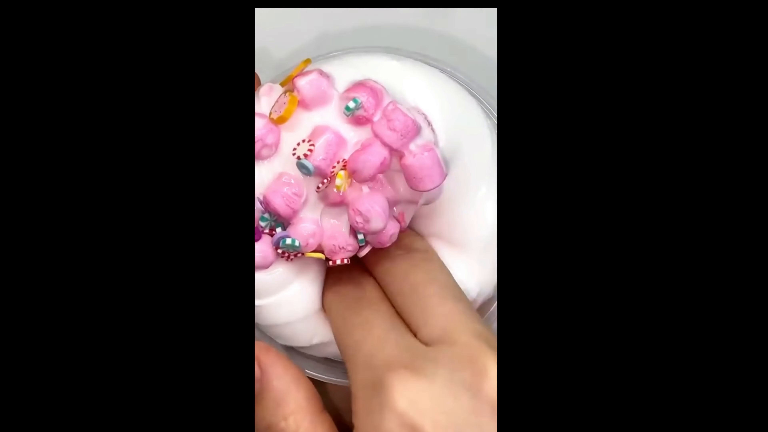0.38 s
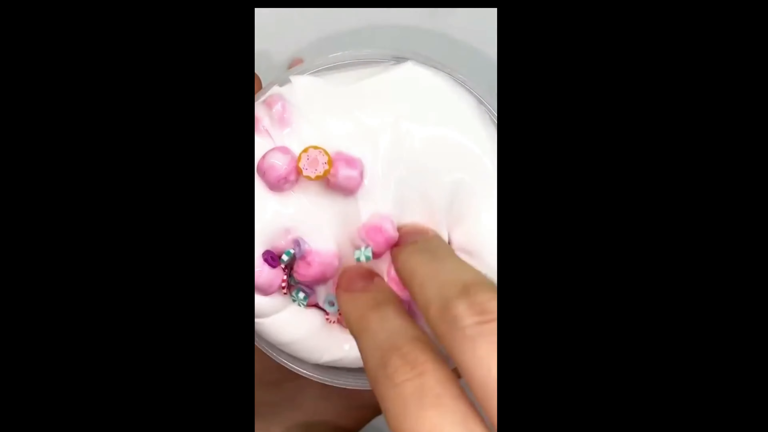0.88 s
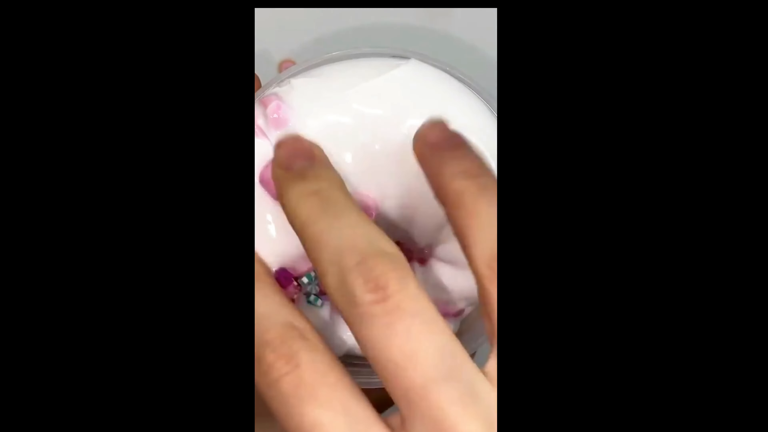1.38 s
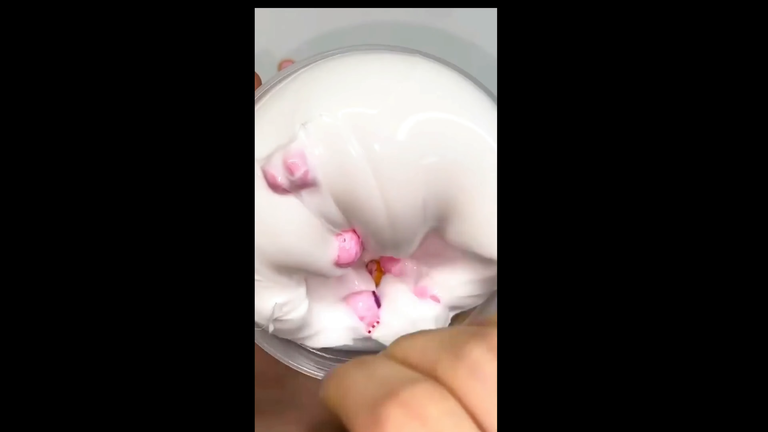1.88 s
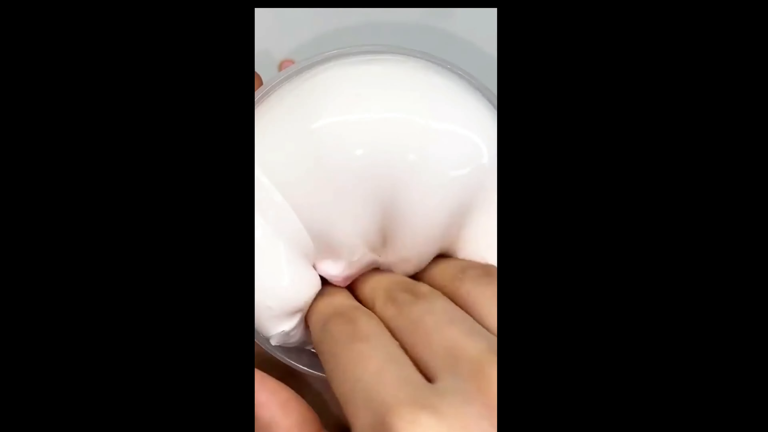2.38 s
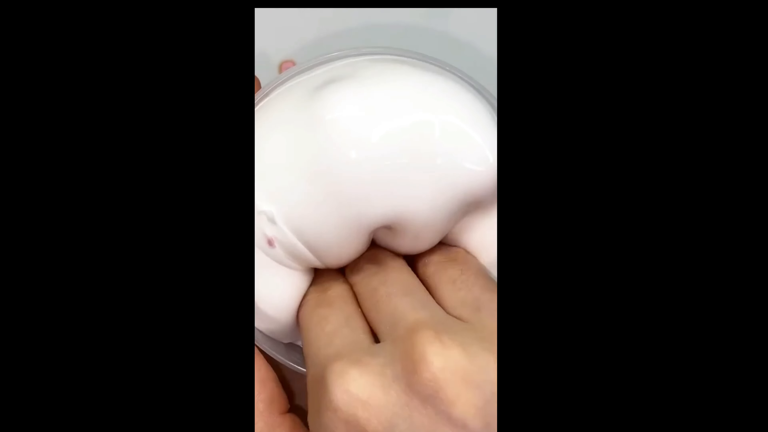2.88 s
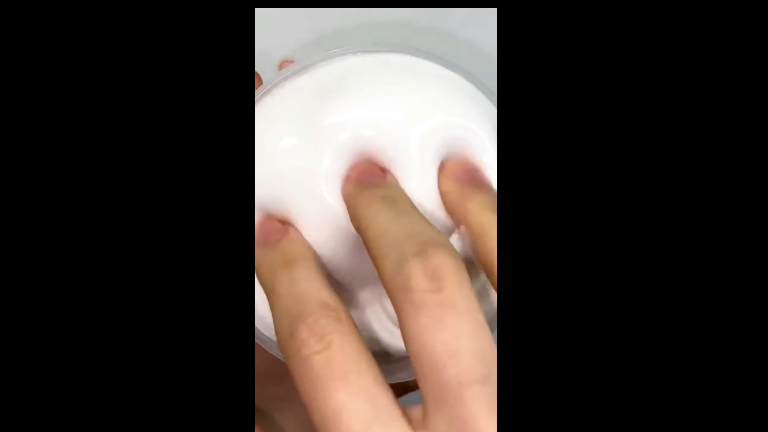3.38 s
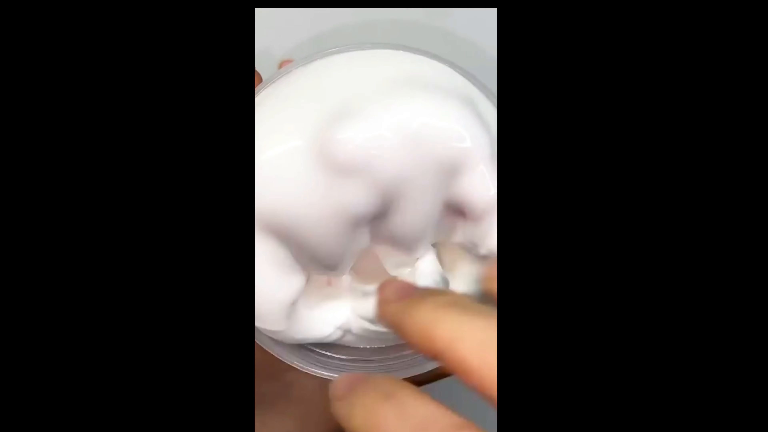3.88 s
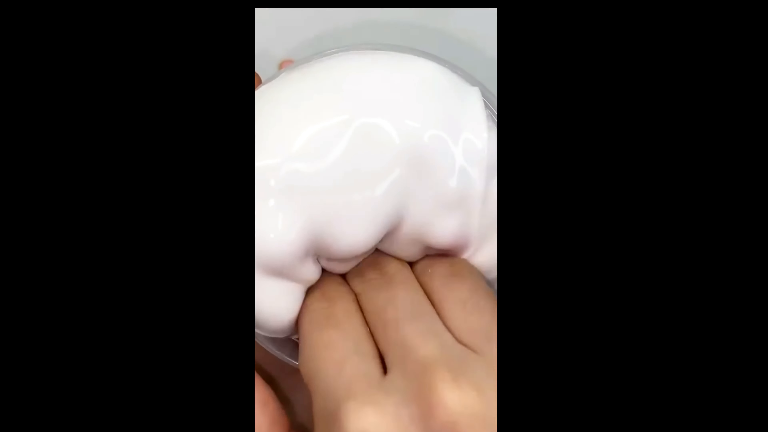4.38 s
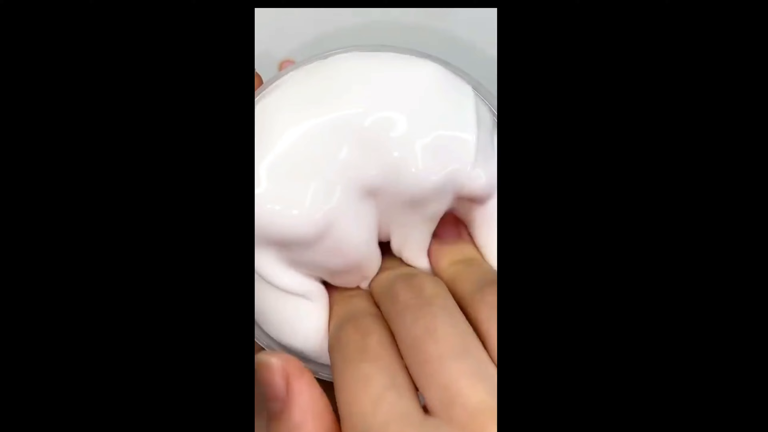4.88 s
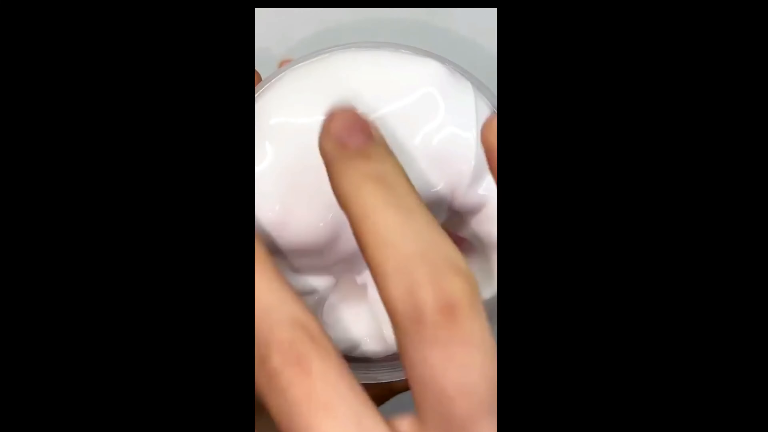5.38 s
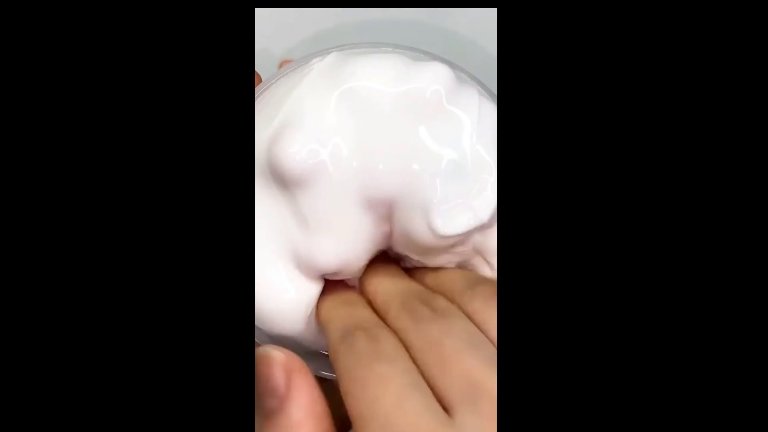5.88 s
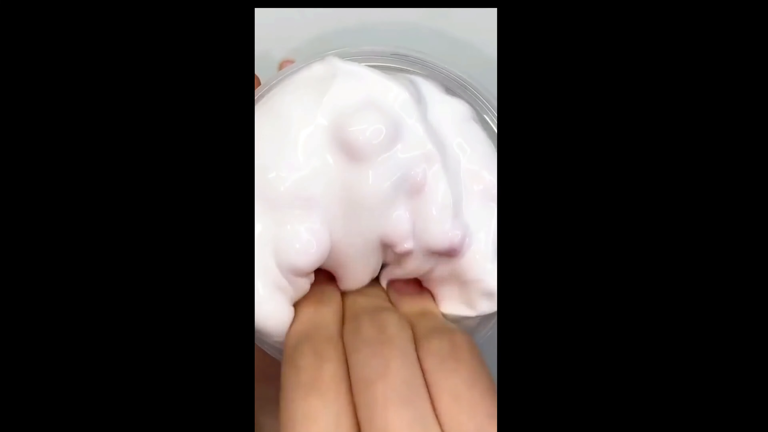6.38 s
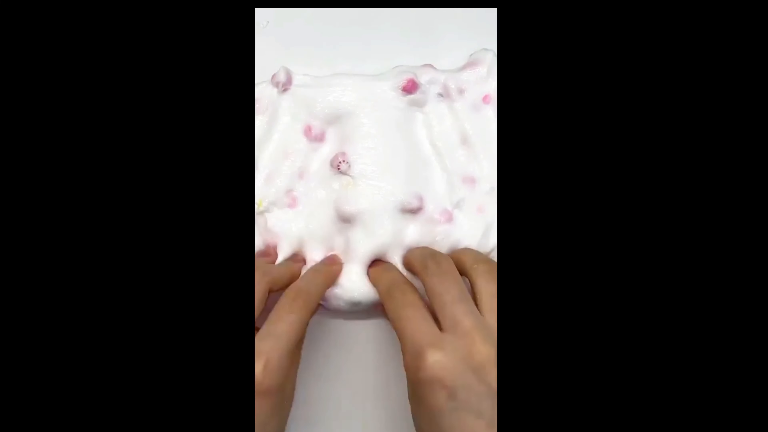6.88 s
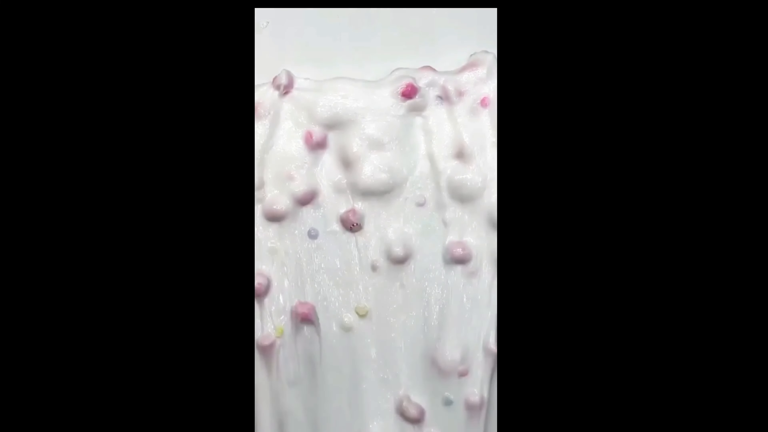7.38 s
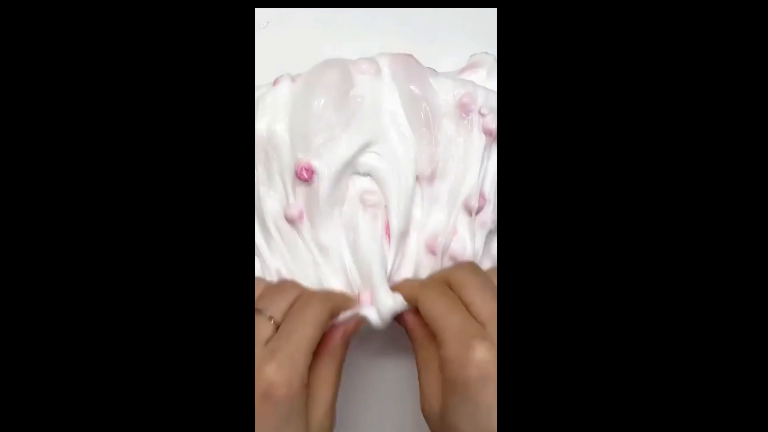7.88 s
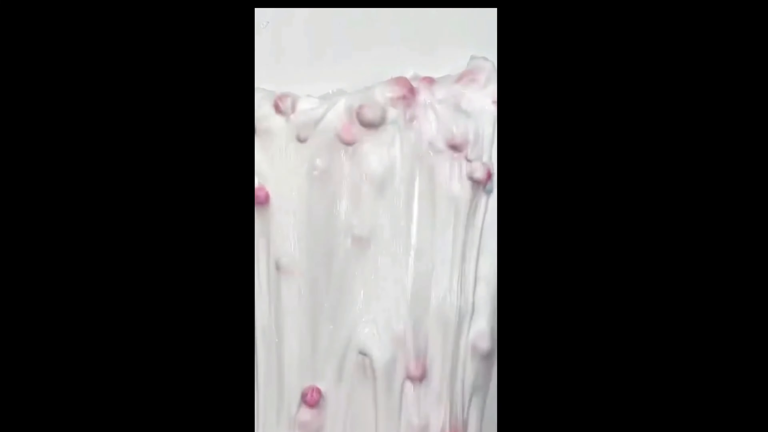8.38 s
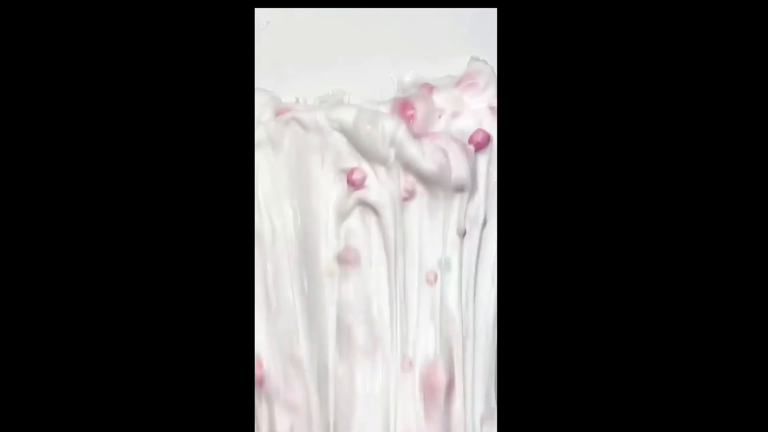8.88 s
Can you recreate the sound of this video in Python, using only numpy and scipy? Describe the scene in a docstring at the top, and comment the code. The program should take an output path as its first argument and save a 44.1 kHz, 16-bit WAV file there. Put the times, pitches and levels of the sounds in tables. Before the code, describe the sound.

Close-up slime handling in a small, quiet, fairly dry room, over a faint hush and low hand rumble. From 0 to 0.7 s, tiny clicks, a bright pop near 0.3 and light sticky crackle as fingers press into the tub. Sharp snaps follow at 0.9 and 1.05, with soft thuds at 1.25 and 1.85. At 2.4 a lower, hollow double pop comes with a heavy push. A tight, loud cluster of bright pops and a thud bursts at 3.0, another at 3.8, then strong snaps at 4.5, 5.2, 5.7 and 5.9, with a brief airy squeak-like hiss at 5.2. A crisp cluster lands at 6.65. From about 7 s the stretched sheet is folded on a table: darker wet squelches, notably at 7.7 and 8.6, rounder pops, soft bumps and faint peeling until about 9 s.

```python
"""A small quiet room, where fingers knead soft slime in a plastic tub, then fold a stretched sheet on a table.
Air pockets burst: a noisy snap over a short hollow ring. Pushes thud: low modes of tub and hand, sagging in pitch.
Sticky skin crackles: grainy noise with tiny bubble rings, driven by squeezes and pulls. Air slides in finger
hollows as narrow noise, the holding hand rumbles, the room answers with decaying noise, and a hush lies behind."""
import sys
import numpy as np
from scipy import signal
from scipy.fft import rfft, irfft, next_fast_len
from scipy.io import wavfile
from scipy.ndimage import uniform_filter1d, map_coordinates

SR = 44100
rng = np.random.default_rng(int(sys.argv[2]) if len(sys.argv) > 2 else 0)


def persist_wave(psi):
    """Save psi, clipped to +-1, as 16-bit WAV."""
    counts = np.round(np.clip(psi, -1, 1) * 32767).astype(np.int16)
    wavfile.write(sys.argv[1], SR, np.atleast_2d(counts).T)


def ratio(d):
    """dB to gain"""
    e = np.asarray(d, float) / 20
    return 10 ** e


N = 396900

# bursting air pockets: start_s, snap_peak_db, pocket_hz, pocket_peak_db
POCKET_BURSTS = [(0.04, -32.5, 1803, -53), (0.079, -39, 1860, -42), (0.1063, -42, 2070, -40),
                 (0.166, -40.5, 6440, -47), (0.2078, -28, 860, -45), (0.308, -22, 3770, -22),
                 (0.5504, -41, 2530, -40), (0.6796, -37, 3350, -53), (0.898, -14, 1580, -27),
                 (0.9738, -30.5, 1560, -38.5), (1.0457, -17, 2960, -21), (1.252, -26, 710, -33.5),
                 (1.6164, -34, 3650, -64.5), (1.787, -45, 6740, -40), (1.8278, -27.5, 1890, -29),
                 (1.8503, -24.5, 740, -28.5), (2.1075, -39, 3150, -71), (2.1648, -34, 3250, -56),
                 (2.393, -22.5, 536, -41), (2.426, -16, 600, -26), (2.4417, -15, 471, -31),
                 (2.773, -53.5, 2490, -61), (3.0112, -10, 3610, -24), (3.028, -26.5, 3330, -43.5),
                 (3.0417, -16.5, 2427, -8.5), (3.0418, -30, 748, -24), (3.043, -18.5, 7420, -12),
                 (3.8187, -13, 2610, -18.5), (3.827, -14.5, 2270, -20), (3.829, -16, 6960, -13.5),
                 (3.8452, -17, 5430, -16.5), (4.118, -48.5, 1593, -63.5), (4.3072, -23, 3480, -35),
                 (4.4716, -31, 3190, -45), (4.503, -7, 702, -32), (4.516, -23, 2510, -30),
                 (4.7969, -36.5, 569, -63.5), (5.125, -38.5, 3600, -45.5), (5.1924, -13.5, 3075, -50),
                 (5.1978, -24.5, 2450, -31), (5.225, -44, 1650, -31.5), (5.2362, -27.5, 1800, -23.5),
                 (5.706, -10, 3380, -28), (5.856, -36.5, 3430, -42.5), (5.8907, -11, 770, -27),
                 (5.935, -18.5, 665, -35.5), (6.223, -40, 2515, -59.5), (6.3841, -44, 1084, -42.5),
                 (6.504, -45.5, 4970, -40), (6.6229, -34.5, 3560, -49.5), (6.648, -15.5, 6060, -11.5),
                 (6.672, -17, 6180, -18.5), (6.6775, -11.5, 2220, -13), (6.678, -31.5, 750, -27.5),
                 (6.8155, -39, 636, -42.5), (6.859, -44, 2570, -49.5), (6.9816, -41.5, 1106, -35),
                 (7.011, -45, 930, -34), (7.092, -53, 1170, -30.5), (7.114, -55, 3500, -31),
                 (7.2012, -57, 1130, -36.5), (7.6928, -28.5, 830, -18.5), (7.707, -41, 2530, -24.5),
                 (7.8996, -43, 1153, -23), (8.061, -63, 1680, -38), (8.556, -44, 940, -45),
                 (8.572, -36, 677, -23.5), (8.611, -27.5, 1480, -17), (8.757, -21.5, 1520, -26),
                 (8.907, -56, 1390, -42), (8.952, -37, 1270, -32.5)]
# pushes and releases: start_s, level_db, t60_s (how long the finger keeps the tub shaking)
PUSHES = [(0.33, -48.5, 0.58), (0.544, -40.5, 0.29), (.568, -35.5, 0.29), (1.049, -46, 1),
          (1.236, -35.5, 0.47), (1.249, -25.5, 0.091), (1.648, -40, 0.26), (1.828, -30, 0.16),
          (1.858, -25.5, 0.27), (2.182, -38.5, 0.38), (2.423, -22, 0.28), (3.007, -30, 0.17),
          (3.044, -19.5, 0.22), (3.83, -22, 0.3), (4.291, -37.5, 0.89), (4.518, -25, 0.32),
          (4.745, -57, 0.47), (5.188, -29.5, 0.41), (5.566, -33.5, 0.88), (5.889, -27.5, 0.4),
          (5.938, -35, 0.24), (6.385, -35.5, 0.27), (6.65, -36.5, 0.1), (6.684, -27.5, 0.22),
          (6.816, -38.5, 0.38), (7.009, -33.5, 0.22), (7.691, -28.5, 0.38), (7.739, -27.5, 0.23),
          (7.897, -32, 0.15), (8.135, -44, 0.24), (8.57, -36.5, 0.47), (8.607, -34.5, 0.55),
          (8.787, -40.5, 0.23)]
# modes of tub and hand: pitch_hz, level_db, rise_s (before the swell factor of each push)
TUB_MODES = [(55.6, -1.5, 0.062), (89, 4, 0.045), (140.9, -0.5, 0.0061), (218.6, -2.5, 0.0031)]
# colour of the rough part of a push: freq_hz, level_db (relative, per Hz)
SQUISH_COLOUR = [(40, -32.5), (90, -3), (200, 2.5), (400, -10), (900, -36.5)]
# colour of tearing film, shared by snaps and fizz: freq_hz, level_db (relative, per Hz)
SNAP_COLOUR = [(880, -43), (1500, -14.5), (2420, -2), (3620, 0.5), (6410, 6.5), (8250, -3), (10800, -1),
               (12600, -6.5), (14100, -34)]
# colour of the wet squelch: freq_hz, level_db (relative, per Hz)
SQUELCH_COLOUR = [(250, -32), (500, -7), (1100, -8.5), (2300, -3.5), (4000, -13), (8000, -38)]
# quick squeezes of the slime: peak_s, fizz_db, squelch_db, climb_db_per_s
QUICK_SQUEEZES = [(0.329, -43, -47.5, 494.5), (0.539, -48, -51, 800), (0.583, -43, -56.5, 498),
                  (0.903, -34.5, -42.5, 1507), (1.248, -42, -45.5, 441), (1.844, -51.5, -46.5, 458),
                  (2.435, -61, -35.5, 913.5), (3.055, -45.5, -36.5, 901), (3.832, -34, -33.5, 1097),
                  (4.517, -61, -38.5, 702), (5.213, -38.5, -34.5, 376), (5.716, -53.5, -60, 308.5),
                  (5.914, -45, -41.5, 505), (6.388, -72, -56, 405.5), (6.674, -45, -42.5, 504),
                  (7.021, -41, -41, 400), (7.699, -41.5, -25.5, 1492), (7.885, -46, -45, 307),
                  (8.14, -50, -61, 299.5), (8.572, -43.5, -39, 1204), (8.614, -41, -32.5, 604),
                  (8.79, -46, -44.5, 400)]
# slow pulls of the slime: start_s, length_s, fizz_db, squelch_db
SLOW_PULLS = [(0.095, 0.17, -57.5, -64), (0.356, 0.042, -59, -66), (0.7, 0.17, -69, -78.5),
              (0.955, 0.14, -56, -58.5), (1.465, 0.024, -66, -77), (1.58, 0.14, -63.5, -78),
              (2.185, 0.08, -70, -80), (3.633, 0.086, -67.5, -72.5), (4.326, 0.056, -58.5, -71.5),
              (5.01, 0.18, -65.5, -80), (6.452, 0.06, -61, -75), (6.989, 0.12, -49.5, -51.5),
              (7.148, 0.14, -60.5, -70), (7.45, 0.31, -67, -73), (7.76, .1, -61, -60.5),
              (7.93, 0.21, -57, -57), (8.335, 0.15, -67, -71), (8.67, 0.15, -65, -53),
              (8.802, 0.17, -59.5, -52.5)]
# air moving in the hollow left by a finger: start_s, length_s, first_hz, last_hz, level_db
FINGER_HOLLOWS = [(4.323, 0.11, 2900, 1379, -66), (5.037, 0.108, 1750, 1900, -65),
                  (5.205, 0.076, 2400, 3060, -41), (6.678, 0.099, 2200, 2110, -55.5),
                  (7.139, 0.25, 1050, 1310, -60.5), (8.402, 0.12, 1400, 1257, -66)]
# colour of the hand shifting on the tub: freq_hz, level_db (relative, per Hz)
RUMBLE_COLOUR = [(30, -7.5), (62, -1), (100, -6), (420, -34.5), (800, -73)]
# decay of the room's answer: freq_hz, t60_s
ROOM_DECAY = [(150, 0.35), (2000, 0.22), (12000, 0.14)]
# colour of the background hush: freq_hz, level_db (relative, per Hz)
HUSH_COLOUR = [(150, -0.5), (220, 1.5), (1000, -15.5), (3500, -21.5), (6600, -19.5), (8500, -24),
               (11300, -25.5), (13500, -47)]

TABLE_S = 6.88  # from here on the sheet lies on the table
# pockets die sooner when small (high) and when torn wide open (snap far over ring)
POCKET_T60_S = (0.045, 0.021)  # in the tub, on the table; at 1 kHz with snap as loud as ring
SHORTER_PER_OCTAVE, SHORTER_PER_DB = 0.27, 0.0331  # exponents of the shortening
# pushes under SOFT_DB swell slower, by this much per dB
SOFT_DB, SLOWER_PER_DB = -30, 0.009
SQUISH_DB = -6.5  # rough part of a push against its modes
SQUEEZE_FALL_DB_PER_S = (421, 387)  # fizz, squelch
PULL_RISE_DB_PER_S, PULL_FALL_DB_PER_S = 189, 193
REST_DB = (-87, -89)  # fizz, squelch of the slime left alone
CONTROL_STEP = 44  # samples between effort values


def unit(x):
    """Scales x to rms 1."""
    return x / np.sqrt(np.mean(x ** 2) + 1e-20)


def peak(x):
    """Scales x to a peak of 1."""
    return x / np.abs(x).max()


def add(track, s, x):
    """Mixes x into the track at time s."""
    track[round(s * SR):][:len(x)] += x


def along(points, hz):
    """Reads a curve of (Hz, value) points on a log frequency axis."""
    f, v = np.transpose(points)
    return np.interp(np.log(hz + 1), np.log(f + 1), v)


def wobble(rate):
    """A smooth random curve with rate knots a second."""
    knots = rng.standard_normal(int(N * rate / SR) + 4)
    return map_coordinates(knots, [np.arange(N) * rate / SR])


def filtered(x, response):
    """Shapes x by a response given as a function of frequency."""
    m = next_fast_len(len(x) + SR // 2)
    return irfft(rfft(x, m) * response(np.fft.rfftfreq(m, 1 / SR)), m)[:len(x)]


def coloured(x, spectrum):
    """Gives x a colour and rms 1."""
    return unit(filtered(x, lambda hz: ratio(along(spectrum, hz))))


def patchy(depth_db, size):
    """Noise whose colour changes in random patches, about a kilohertz wide and size x 1.5 ms long."""
    z = signal.stft(rng.standard_normal(N + SR), nperseg=128)[2]
    field = uniform_filter1d(rng.standard_normal(z.shape), size=3, axis=0)
    field = uniform_filter1d(field, size=size, axis=1)
    return signal.istft(z * ratio(depth_db * unit(field)), nperseg=128)[1][:N + SR]


def pops():
    """A burst of noise with a very short soft rise before it, then a brief pocket ring."""
    out, lead = np.zeros(N + SR), 0.008
    t = np.arange(SR // 10) / SR - lead
    after = np.maximum(t, 0)
    lead_in = 0.15 * np.exp(t / 0.0015) + 0.85 * np.exp(t / 0.0003)
    onset = np.where(t < 0, lead_in, 1)
    tearing = coloured(patchy(depth_db=6.0, size=8), SNAP_COLOUR)
    rush = rng.standard_normal(N + SR)
    for s, snap_db, hz, pocket_db in POCKET_BURSTS:
        k = round(s * SR)
        octaves, torn_db = np.log2(hz / 1000), max(snap_db - pocket_db, -15)
        shortening = np.exp(-SHORTER_PER_OCTAVE * octaves - SHORTER_PER_DB * torn_db)
        t60 = POCKET_T60_S[s > TABLE_S] * shortening
        snap_fade = ratio(-60 * after / (0.74 * t60)) + ratio(-60 * after / 0.00083)
        snap = onset * snap_fade * tearing[k:k + len(t)]
        # the mouth widens, so the pitch climbs at first
        ring = np.sin(2 * np.pi * hz * (after - 0.23 * 0.0027 * (1 - np.exp(-after / 0.0017))))
        # air rushing out blurs the ring with noise around the pocket's pitch
        band = signal.butter(2, [hz * 0.72, hz * 1.23], "band", fs=SR)
        blur = unit(signal.lfilter(*band, rush[k:k + len(t)]))
        pocket = onset * ratio(-60 * after / t60) * (0.64 * ring + 0.6 * blur)
        add(out, s - lead, ratio(snap_db) * peak(snap) + ratio(pocket_db) * peak(pocket))
    return out[:N]


def thuds():
    """A push shakes the tub: high modes speak at once and die, low ones swell late; soft slime blurs them all."""
    out, t = np.zeros(N + SR), np.arange(SR // 2) / SR
    blurs = [1 + 0.8 * (wobble(hz * 0.4) + 1j * wobble(hz * 0.4)) for hz, *_ in TUB_MODES]
    squish = coloured(rng.standard_normal(N), SQUISH_COLOUR) * ratio(3.3 * wobble(45))
    mode_luck_db = rng.standard_normal((len(PUSHES), len(TUB_MODES)))
    for (s, db, t60), luck_db in zip(PUSHES, mode_luck_db):
        k = np.minimum(round(s * SR) + np.arange(len(t)), N - 1)
        slow = 0.5 + SLOWER_PER_DB * max(SOFT_DB - db, 0)
        modes = 0
        for (hz, level_db, rise), gain_db, blur in zip(TUB_MODES, luck_db, blurs):
            # the squeezed wall starts stiffer, so each mode sags in pitch
            phase = 2 * np.pi * np.cumsum(hz * (1 + 0.3 * np.exp(-t / 0.012))) / SR
            swell = (1 - np.exp(-t / (rise * slow))) ** 2
            # damping grows with pitch
            fade = ratio(level_db + gain_db - 60 * t * (1 / t60 + (hz / 100) ** 2))
            modes = modes + swell * fade * (blur[k] * np.exp(1j * phase)).imag
        rough = (1 - np.exp(-t / (0.0024 * slow))) * ratio(-60 * t / (0.68 * t60)) * squish[k]
        add(out, s, ratio(db) * (peak(modes) + ratio(SQUISH_DB) * peak(rough)))
    return out[:N]


def crackle():
    """Sticky skin peels off: a fine bright fizz over a lower, wetter squelch, with bubbles in both."""
    fizz_db, squelch_db = effort()
    lumps_db = 1.3 * wobble(25)
    fizz = coloured(grains(rate=150, spread_db=3, life=0.0025), SNAP_COLOUR)
    squelch = coloured(grains(rate=150, spread_db=0.5, life=0.0027), SQUELCH_COLOUR)
    # the wide sheet on the table sounds darker than the lump in the tub
    darker = unit(signal.lfilter(*signal.butter(1, 1000, fs=SR), squelch))
    squelch = np.where(np.arange(N) < TABLE_S * SR, squelch, darker)
    wet = bubbles(per_s=220, cycles=4, spread_db=3.5)
    fizz_gain, squelch_gain = ratio(fizz_db + lumps_db), ratio(squelch_db + lumps_db)
    wet_gain = ratio(-9.5) * np.hypot(fizz_gain, squelch_gain)
    return fizz_gain * fizz + squelch_gain * squelch + wet_gain * wet


def effort():
    """Levels of fizz and squelch in dB: the strongest squeeze or pull of the moment, or rest."""
    peak_s, *squeeze_db, climb = np.transpose(QUICK_SQUEEZES)
    start, length, *pull_db = np.transpose(SLOW_PULLS)
    control = np.arange(0, N, CONTROL_STEP)
    out = []
    for quick_db, slow_db, fall, rest_db in zip(squeeze_db, pull_db, SQUEEZE_FALL_DB_PER_S, REST_DB):
        squeezes = swell_db(peak_s, 0, quick_db, climb[:, None], fall)
        pulls = swell_db(start, length, slow_db, PULL_RISE_DB_PER_S, PULL_FALL_DB_PER_S)
        strongest = np.vstack([squeezes, pulls]).max(axis=0)
        out.append(np.interp(np.arange(N), control, np.maximum(strongest, rest_db)))
    return out


def swell_db(start, length, db, rise, fall):
    """Levels that climb at a steady dB rate, hold and sink again; one row per event."""
    t = np.arange(0, N, CONTROL_STEP) / SR
    start, end, db = (np.asarray(v)[:, None] for v in (start, start + length, db))
    return db - rise * np.maximum(start - t, 0) - fall * np.maximum(t - end, 0)


def grains(rate, spread_db, life):
    """Tiny tears at random moments and of very unequal size, each a short puff of noise, over a steady peel."""
    chance = rng.random((2, N))
    sizes = (chance[0] < rate / SR) * ratio(-spread_db * np.log(chance[1] + 0.02))
    t = np.arange(SR // 50) / SR
    puffs = unit(signal.fftconvolve(sizes, np.exp(-t / life))[:N])
    peel = 0.9
    return (peel + puffs) * patchy(depth_db=3.5, size=14)[:N]


def bubbles(per_s, cycles, spread_db):
    """Tiny trapped bubbles burst at random, each a short rising ring of its own pitch and size."""
    when, pitch, size = rng.random((round(per_s * N / SR), 3)).T
    hz = (700 * (7500 / 700) ** pitch)[:, None]
    t = np.arange(SR // 50) / SR
    rising = hz * t * (1 + 0.02 * hz * t / cycles)
    rings = np.sin(2 * np.pi * rising) * np.exp(-hz * t / cycles)
    rings *= ratio(-spread_db * np.log(size + 0.01))[:, None]
    where = (when * N).astype(int)[:, None] + np.arange(len(t))
    return unit(np.bincount(where.ravel(), rings.ravel(), N + SR)[:N])


def hollows():
    """A narrow band of noise slides in pitch as the hollow changes its size."""
    out = np.zeros(N + SR)
    flutter = (wobble(650) + 1j * wobble(650)) * ratio(5 * wobble(70))
    for s, length, first_hz, last_hz, db in FINGER_HOLLOWS:
        u = np.arange(round(length * SR)) / (length * SR)
        phase = 2 * np.pi * np.cumsum(first_hz + (last_hz - first_hz) * u) / SR
        air = flutter[round(s * SR):][:len(u)] * np.exp(1j * phase)
        add(out, s, ratio(db) * np.sin(np.pi * u ** 0.53) ** 2 * air.real)
    return out[:N]


def handling():
    """The hand that holds the tub shifts in uneven lumps, more so while the other hand works the slime."""
    effort_db = uniform_filter1d(effort()[1], size=SR // 5)
    lumps_db = 3.5 * wobble(13)
    gain = ratio(-61 + 0.051 * (effort_db + 72.0) + lumps_db)
    return gain * coloured(rng.standard_normal(N), RUMBLE_COLOUR)


def room(x):
    """Each frequency of the room's answer dies at its own speed; the tail differs from moment to moment."""
    out, step = np.zeros(N + SR), SR // 4
    for k in range(0, N, step):
        hz, t, z = signal.stft(rng.standard_normal(SR // 3), SR, nperseg=256)
        fade = ratio(-60 * t / along(ROOM_DECAY, hz)[:, None])
        tail = signal.istft(z * fade, SR, nperseg=256)[1]
        answer = signal.fftconvolve(x[k:k + step], tail / np.linalg.norm(tail))
        add(out, k / SR + 0.009, answer)  # 9 ms later
    return out[:N]


def hush():
    """Steady coloured noise, the faint floor behind everything."""
    return ratio(-74.5) * coloured(rng.standard_normal(N), HUSH_COLOUR)


def scene():
    """Mixes all sources with the room's answer and the hush behind them."""
    near = pops() + crackle() + hollows()
    return (near + ratio(-19) * room(near) + thuds() + handling() + hush())[None]


def band_limit(x):
    """A steep low-pass at the top of the band."""
    return signal.sosfilt(signal.butter(12, 14220, fs=SR, output="sos"), x)


def record(dry):
    """The microphone end loses deep bass and top treble and has a dip near 8.6 kHz."""
    band = signal.butter(5, [42, 13200], "band", fs=SR, output="sos")
    dipped = filtered(dry[0], lambda hz: 1 - 0.48 * np.exp(-((hz - 8600) / 600) ** 2))
    mix = signal.sosfilt(band, dipped[None])
    return band_limit(mix)


dry = scene()
out = record(dry)
persist_wave(out)
```